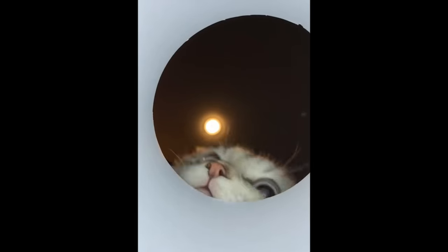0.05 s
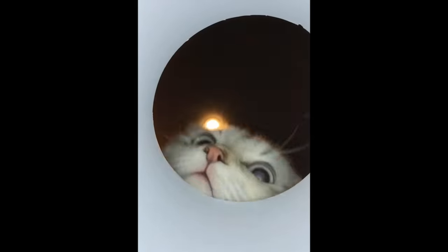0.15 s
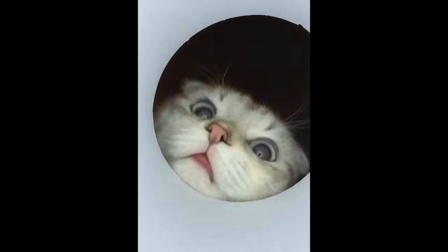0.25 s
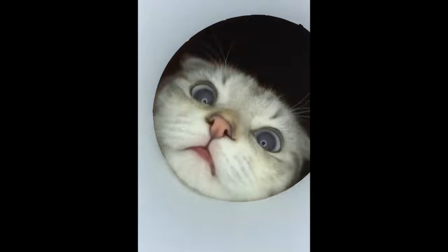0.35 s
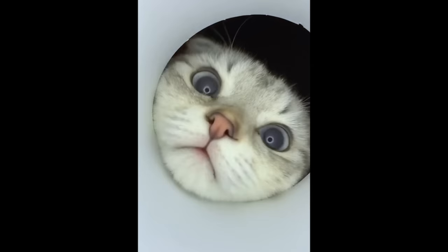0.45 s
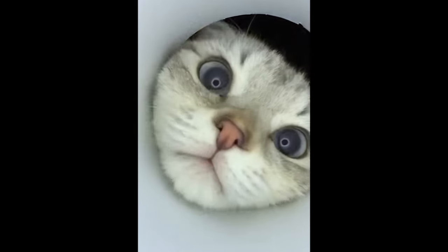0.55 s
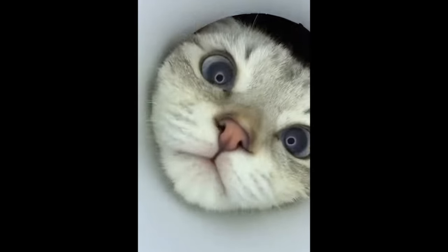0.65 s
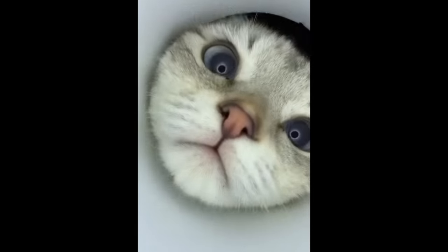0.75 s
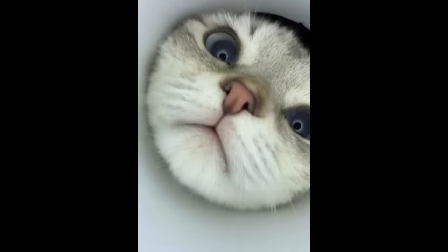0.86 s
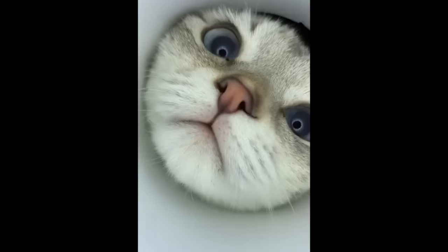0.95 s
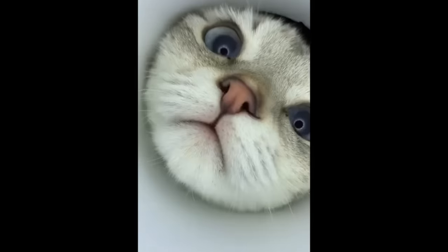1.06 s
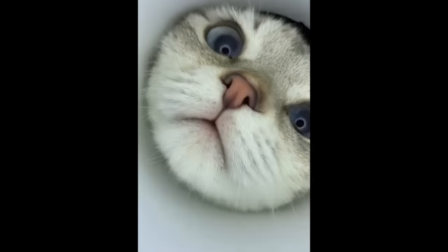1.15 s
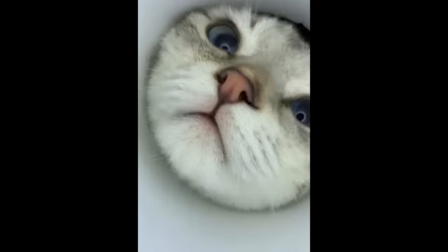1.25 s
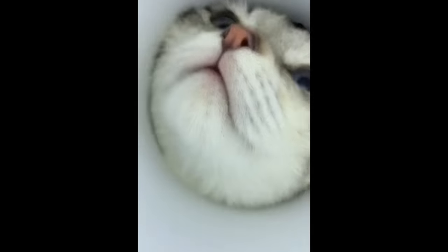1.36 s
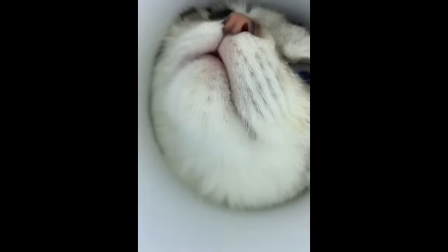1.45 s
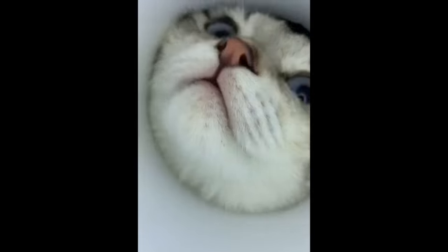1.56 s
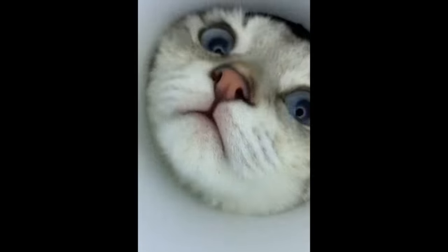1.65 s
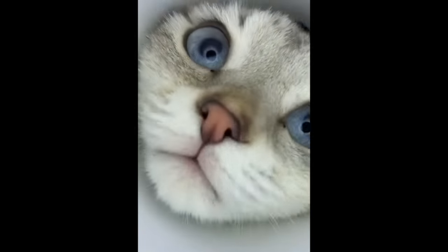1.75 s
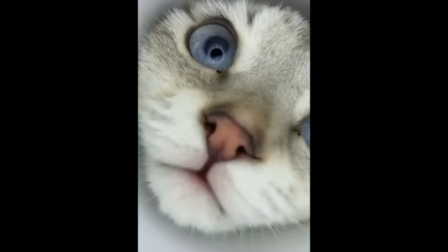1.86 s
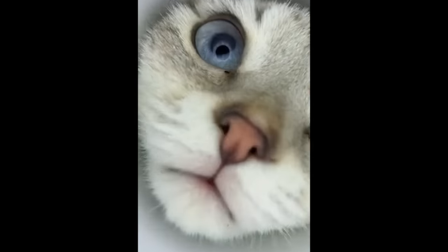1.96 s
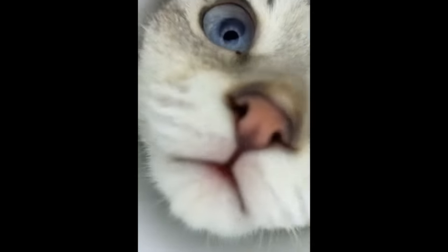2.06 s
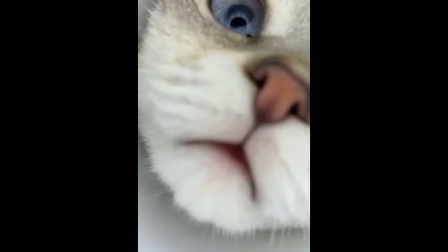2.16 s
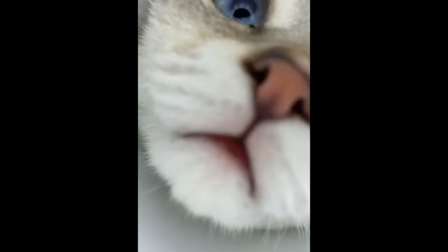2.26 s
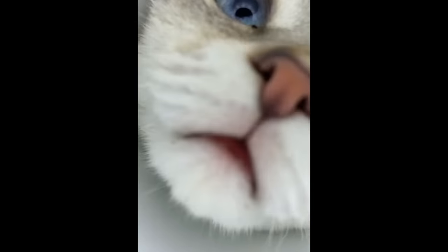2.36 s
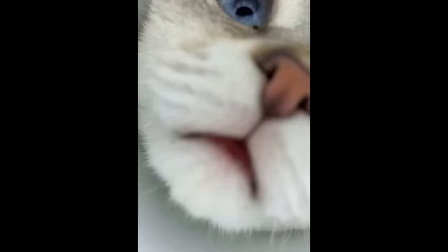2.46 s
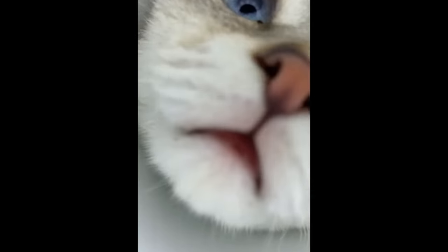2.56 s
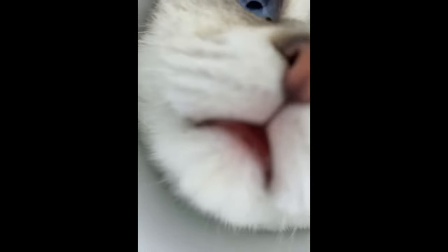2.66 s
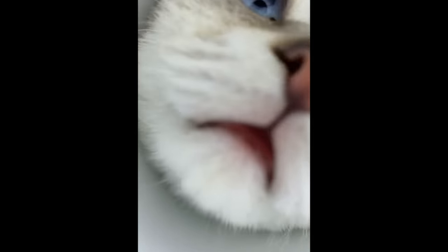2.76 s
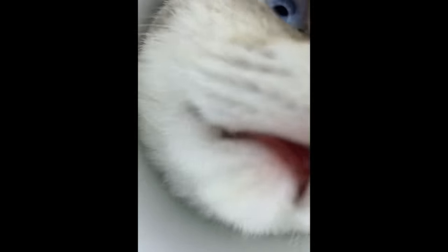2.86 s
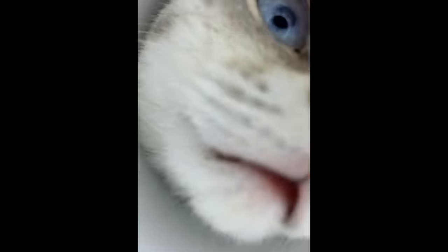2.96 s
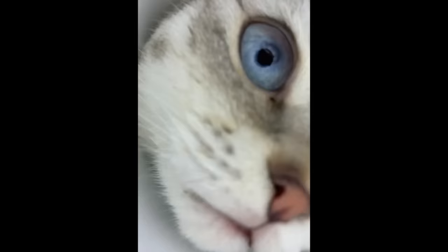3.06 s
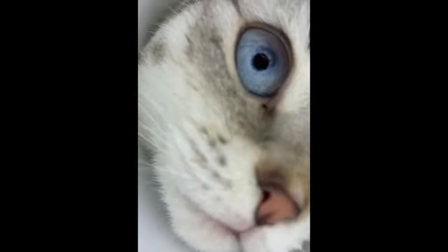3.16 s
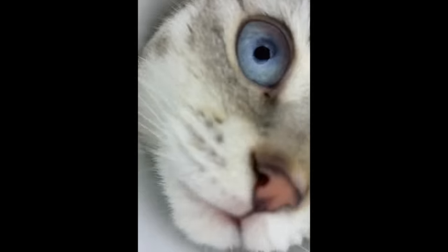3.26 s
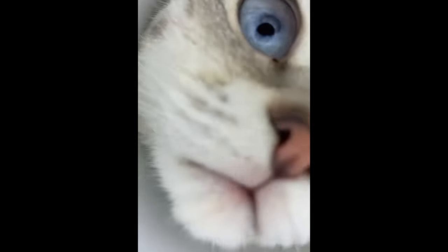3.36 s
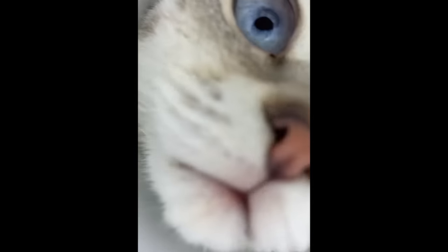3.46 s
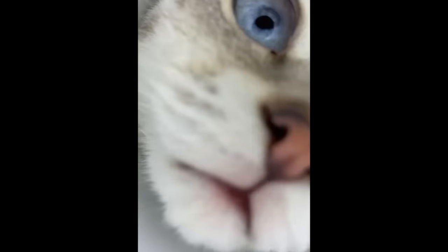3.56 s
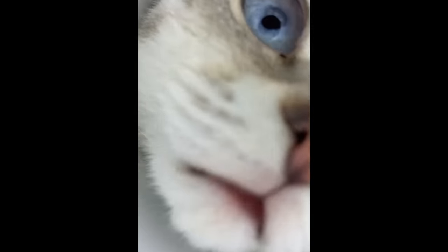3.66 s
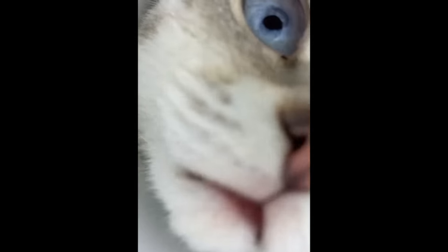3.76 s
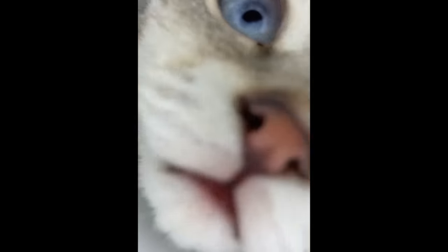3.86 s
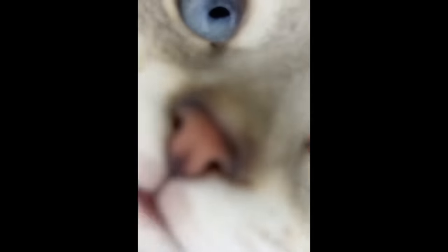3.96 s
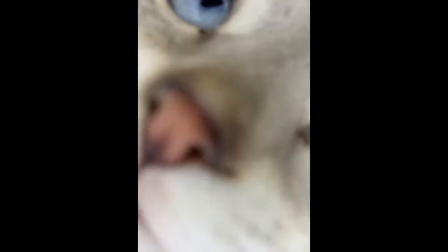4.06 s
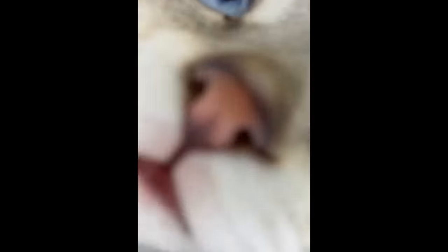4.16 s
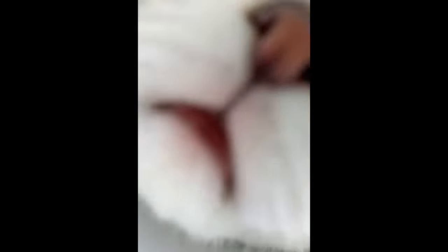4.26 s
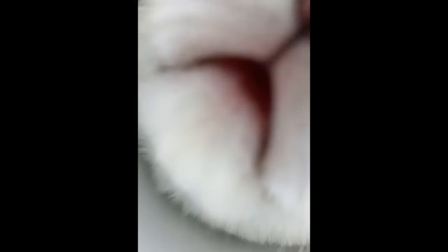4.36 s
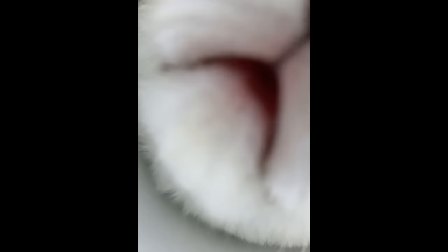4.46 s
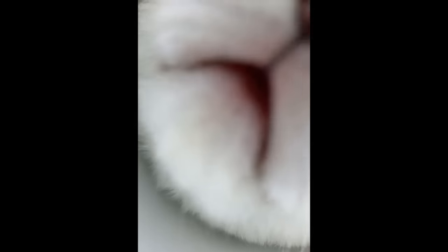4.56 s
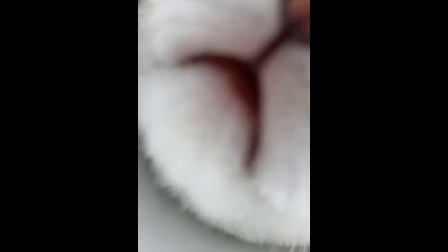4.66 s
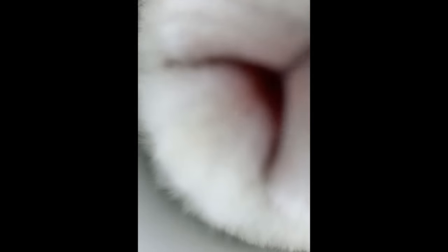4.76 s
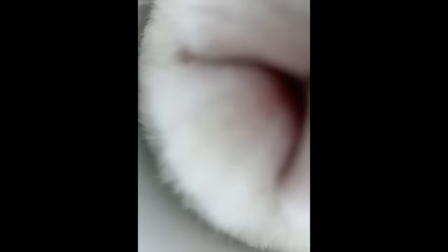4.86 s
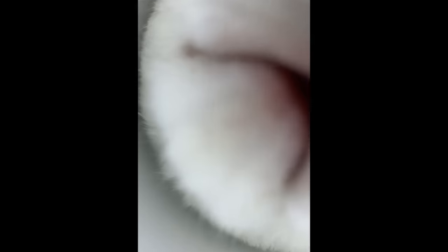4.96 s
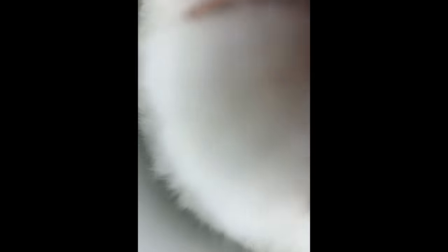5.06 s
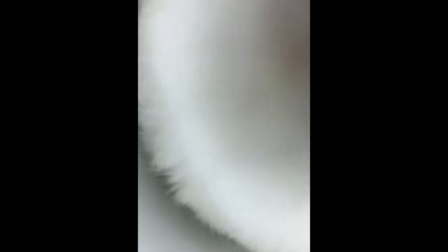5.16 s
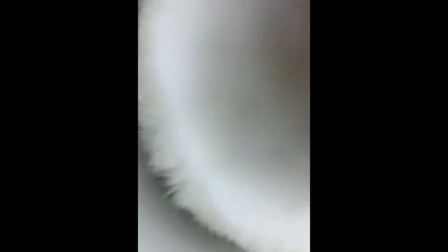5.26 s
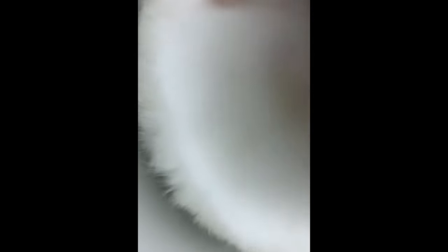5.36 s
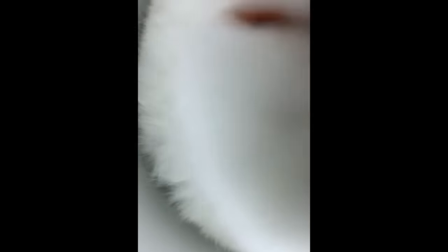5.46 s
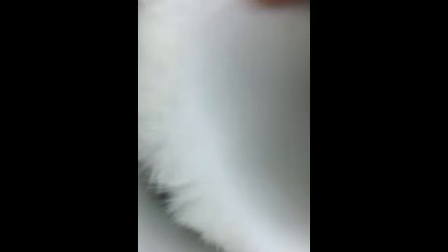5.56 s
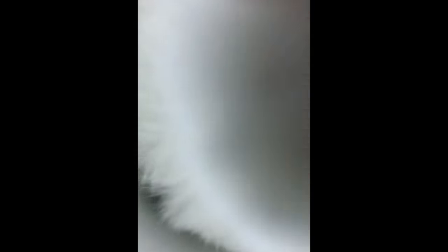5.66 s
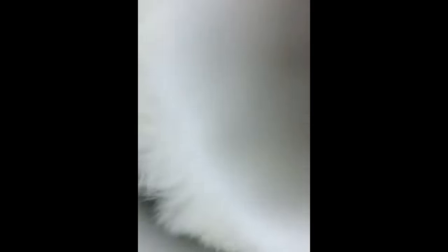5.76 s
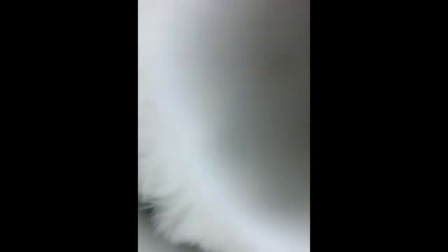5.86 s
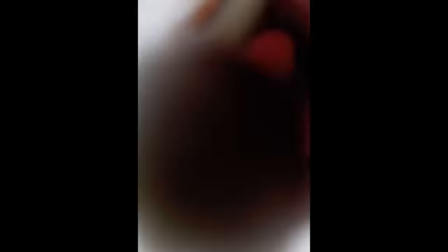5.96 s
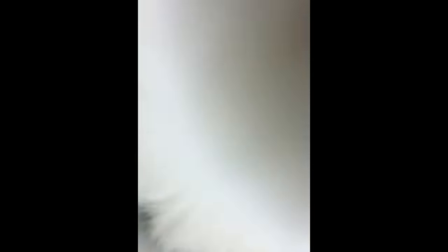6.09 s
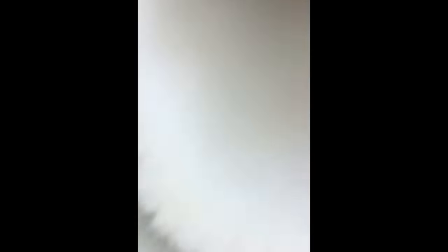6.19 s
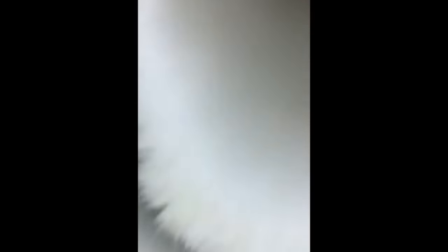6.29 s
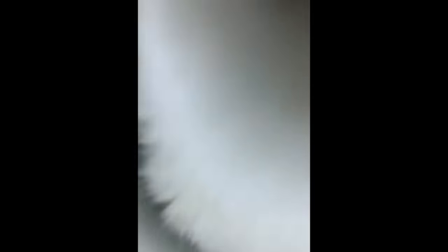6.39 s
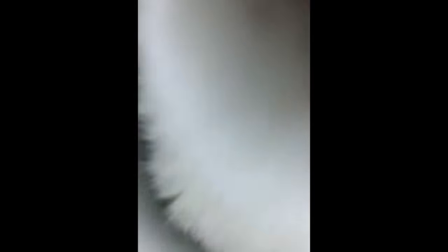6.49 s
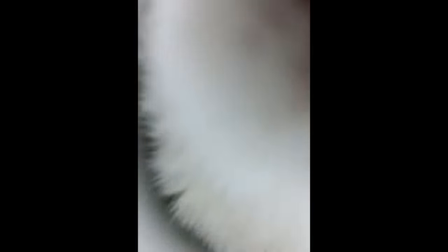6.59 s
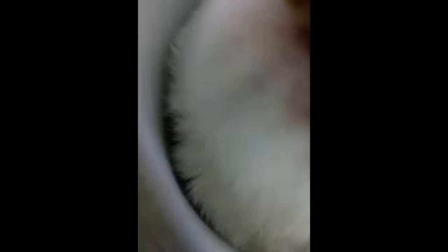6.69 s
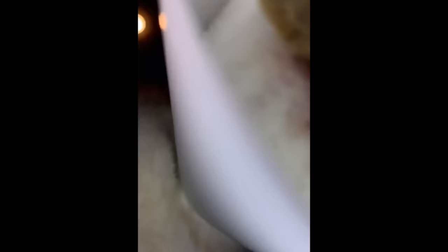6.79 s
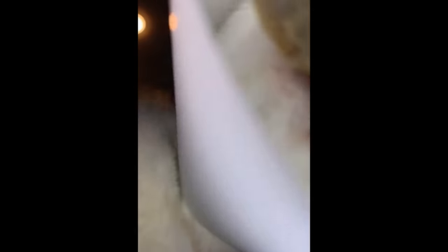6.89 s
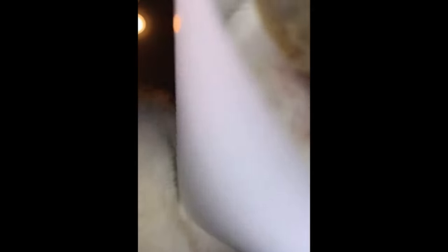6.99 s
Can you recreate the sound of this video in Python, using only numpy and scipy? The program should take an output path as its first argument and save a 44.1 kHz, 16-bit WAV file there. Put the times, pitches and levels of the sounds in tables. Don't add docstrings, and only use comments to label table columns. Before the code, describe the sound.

Very close handling noise of a cat pushing its head into a plastic cone. Fur brushes in soft hissing strokes with faint hair ticks, low bumps and creaks for about five seconds. Then a sudden hard knock and claw clicks hit the phone, followed by bursts of crackly scraping, dull thuds and nibbling ticks right on the microphone, easing at the end. No meow, quiet surroundings.

```python
import sys
import numpy as np
from scipy import signal
from scipy.fft import rfft, irfft, next_fast_len
from scipy.io import wavfile
from scipy.ndimage import uniform_filter1d, minimum_filter1d

SR = 44100
rng = np.random.default_rng(int(sys.argv[2]) if len(sys.argv) > 2 else 0)


def bounce(signal):
    frames = np.transpose(np.atleast_2d(signal))
    limited = np.clip(frames, -1, 1)
    pcm = np.round(limited * 32767).astype(np.int16)
    wavfile.write(sys.argv[1], SR, pcm)


def linear_from_db(decibels):
    return 10 ** (np.asarray(decibels, float) / 20)


N = 310057
EDGE_HZ = 13020


def evened(x):
    return x / np.sqrt(np.mean(x ** 2) + 1e-20)


def colour(x, points):
    f, db = np.transpose(points)
    hz = np.fft.rfftfreq(len(x), 1 / SR) + 1
    gain_db = np.interp(np.log(hz), np.log(f), db, left=-60)
    return irfft(rfft(x) * linear_from_db(gain_db), len(x))


def slow(hz):
    return evened(signal.lfilter(*signal.butter(2, hz, fs=SR), rng.standard_normal(N)))


def grit(spread_db, per_s):
    size = linear_from_db(spread_db * np.minimum(rng.exponential(1, N), 4))
    slips = size * (rng.random(N) < per_s / SR)
    return evened(rng.standard_normal(N) * (1 + slips))


def add(mix, s, sound):
    part = mix[round(s * SR):][:len(sound)]
    part += sound[:len(part)]


# start_s, peak_db
JOLTS = [(0.303, -44.5), (0.733, -47), (1.022, -46), (1.297, -45), (1.617, -43), (1.868, -41.5),
         (2.02, -41), (2.303, -42), (2.536, -42), (2.69, -34.5), (2.987, -37.5), (3.288, -43.5),
         (3.419, -43), (3.536, -40), (3.698, -48.5), (3.873, -43.5), (4.171, -39), (4.396, -46),
         (4.637, -41), (4.826, -44), (4.949, -43.5), (5.137, -13), (5.334, -45), (5.495, -26), (5.79, -40),
         (6.075, -23), (6.12, -18.5), (6.234, -30.5), (6.538, -34)]


def jolts():
    out, t = np.zeros(N), np.arange(round(0.045 * SR)) / SR
    rock = np.hanning(len(t)) * np.sin(2 * np.pi * 50 * t)
    for s, db in JOLTS:
        add(out, s, linear_from_db(db + 4.5) * rock)
    return out


# start_s, length_s, level_db, centre_hz, width_hz
BRUSHES = [
    (5.472, .025, -47, 8500, 2000),
    (5.575, 0.014, -38, 6040, 1500),
    (6.511, .045, -45, 12000, 2000),
    (6.516, 0.075, -50, 9000, 1500),
    (6.568, .1, -51, 5440, 2000),
    (6.582, 0.078, -54, 12200, 1500),
    (6.784, 0.16, -53.5, 12770, 1600),
]


def brushes():
    out = np.zeros(N)
    for s, length, db, hz, width in BRUSHES:
        noise = rng.standard_normal(8192)[:round(max(length, .01) * SR)]
        edges_hz = [hz - width / 2, hz + width / 2]
        band = signal.sosfilt(signal.butter(3, edges_hz, "band", fs=SR, output="sos"), noise)
        add(out, s, linear_from_db(db) * signal.windows.tukey(len(band), .4) * evened(band))
    return out


# start_s, peak_db, pitch_hz, t60_s
RINGS = [(3.1095, -36, 2250, .012), (3.12, -33.5, 1390, 0.024), (3.119, -35, 2220, .014),
         (3.1195, -41, 4470, .009), (3.189, -45, 3120, 0.0092), (3.192, -38, 1200, 0.0088),
         (3.121, -37, 450, 0.017), (4.821, -24, 7660, .008), (4.823, -28.5, 468, 0.027),
         (4.822, -33, 2250, .02), (5.151, -14, 2600, .01), (5.4555, -14, 5370, 0.0059),
         (5.507, -5.5, 1100, 0.0087), (5.572, -13.5, 6070, 0.0054), (6.089, -18.5, 880, 0.015),
         (6.3273, -21, 650, .015), (6.418, -30, 700, 0.013), (6.4514, -12.5, 1450, 0.0038),
         (5.152, -18, 3800, 0.0071), (6.562, -23, 1530, 0.0075), (6.561, -22, 2980, .004),
         (6.56, -28, 4200, 0.0048)]


def rings():
    out, t = np.zeros(N), np.arange(2048) / SR
    for s, db, hz, t60 in RINGS:
        fade = linear_from_db(db - 60 * t / max(t60, .003)) * np.minimum(t / 0.00017, 1)
        add(out, s, fade * np.sin(2 * np.pi * hz * t))
    return out


# start_s, peak_db, bright_top_db, dull_part_db
HAIR_TICKS = [(1.2231, -62, -14, -15), (1.428, -48, -31, 2), (1.5, -28.5, -21, -32),
              (1.8844, -23.5, -23, -15), (2.374, -31.5, -4.5, -19), (3.096, -35, -1, -20),
              (3.1088, -43, -14, -28), (3.119, -29, -5, -8), (3.1897, -27, -8, -27),
              (4.3309, -28.5, -16, -6), (4.6078, -59, -11, 4), (4.784, -21.5, -15, -14),
              (4.8225, -13.5, -12.5, -39)]
# start_s, peak_db, bright_top_db, dull_part_db
CLAW_TICKS = [(5.136, -36, -9, 5), (5.1507, 0.5, -45, -3.5), (5.181, -27, -4, 1), (5.346, -38.5, -12, 22.5),
              (5.3894, -14.5, -32, -21), (5.4556, -5.5, -16, -12), (5.4722, -21.5, 4.5, 7),
              (5.4814, -17, 1, 5), (5.4956, -6, -10.5, -9), (5.5058, -13, -33.5, 0),
              (5.5174, -25, 2.5, -18), (5.5245, -15.5, 3, 7), (5.5427, -17, -5, -4), (5.57, -10.5, -13, 3),
              (5.5822, -22, -32, 3), (5.6086, -1.5, -20, -7), (5.6218, -6, -15, -6),
              (5.7866, -31.5, -20, 12.5), (5.797, -34.5, -22, 14), (5.8659, -36, -30, 25.5),
              (5.884, -32, -21, 15.5), (5.9696, -29, -23, 10), (5.9892, -33, -17, 15)]
# start_s, peak_db, bright_top_db, dull_part_db
NIBBLES = [(6.0835, -36, -50, 5), (6.093, -41, -26, 3), (6.112, -12, -31, -22), (6.135, -8, -36, -14),
           (6.1737, -26.5, 7, 6.5), (6.2165, -13, -17, -17), (6.2292, -34, 2, -25),
           (6.2584, -23.5, -15, -32), (6.3132, -5.5, -9, -4.5), (6.321, -7.5, -5.5, -4),
           (6.3292, -18, -31, -19), (6.343, -10, -22, -1.5), (6.3513, -21, -8, -32),
           (6.4106, -11, -30, -22), (6.4173, -34.5, -18, 19), (6.432, -22, -18, 0), (6.4504, -14, -46, 4.5),
           (6.509, -25, -20, 2.5), (6.5124, -23, -24, -3), (6.561, -3, -25, -12), (6.6722, -19, -5, 12),
           (6.6783, -12, -12, -7), (6.6964, -17, -25, 4), (6.8553, -19.5, -55, -2),
           (6.8678, -16.5, -43, -14), (6.946, -53, -28, 3), (6.9598, -40, 2.5, -4)]
# start_s, peak_db, bright_top_db, dull_part_db
MORE_TICKS = [(5.1625, -19, -29, -20), (5.533, -18, -25, 1), (5.553, -31, 3, -15), (5.564, -32, -3, -20),
              (5.576, -22, -8, -19), (6.088, -32, -32, -13), (6.140, -17, -25, -5), (6.327, -18, -29, 8),
              (6.337, -26, -2, -8), (6.347, -20, -12, -8), (6.4195, -16, -25, -5), (6.544, -36, 10, -15),
              (6.684, -20, 5, 2), (6.691, -23, 0, -2), (6.88, -24, -30, -16), (5.9775, -25, -23, 4),
              (6.515, -20, -25, 1)]
# freq_hz, level_db
GRIND = [(800, -7), (1500, -2), (3000, -0.5), (4500, -12), (7000, -25.5)]
# freq_hz, level_db
FIZZ = [(3000, 5), (4500, 0.5), (8000, -3), (12800, -9.5)]
# freq_hz, level_db
DULL = [(100, -15), (300, -7), (600, -0.5), (1200, -4), (2200, -15), (5000, -82)]


def ticks(rows):
    mid, top, dull = np.zeros((3, N))
    t = np.arange(512) / SR
    for (s, db, top_db, dull_db), noise in zip(rows, rng.standard_normal((len(rows), 512))):
        snap = linear_from_db(db - 60 * t / 0.0071) * (1 - np.exp(-t / 0.001)) * noise
        add(mid, s, snap)
        add(top, s, linear_from_db(top_db) * snap)
        add(dull, s, linear_from_db(db + dull_db - 60 * t / 0.0022))
    return linear_from_db(6.0) * colour(mid, GRIND) + linear_from_db(14.0) * colour(top, FIZZ) + linear_from_db(7.0) * colour(dull, DULL)


# start_s, level_db, dull_share_db, fizz_share_db, length_s
STROKES = [(5.134, -47.5, 12.5, -11, 0.0096), (5.305, -46.5, 6, -8, 0.12), (5.465, -30.5, 3.5, -4, 0.031),
           (5.496, -33, -7, -17, 0.067), (5.56, -32, -5, -12, 0.029), (5.613, -43.5, 8, -3, 0.032),
           (5.764, -56, 9, -8, 0.067), (5.864, -51, 12.5, -13, 0.073), (5.958, -46.5, -5, -3, 0.06),
           (6.077, -40.5, 11.5, -39, 0.028), (6.122, -27, 2.5, -9, 0.035), (6.204, -42, -4, -0.5, 0.035),
           (6.323, -32, 15.5, 12, 0.0064), (6.325, -30, -0.5, -23, 0.036), (6.413, -35, 4, -33, 0.017),
           (6.525, -55, -16, 11, 0.072), (6.583, -47, 1.5, 4.5, 0.16), (6.669, -37.5, 8.5, 4.5, 0.044),
           (6.93, -50.5, 2.5, -7, 0.095)]


def strokes():
    grind, dull, fizz = np.zeros((3, N))
    for s, db, dull_db, fizz_db, length in STROKES:
        shape = signal.windows.tukey(round(max(length, .005) * SR), .6)
        for layer, share_db in (grind, 0), (dull, dull_db), (fizz, fizz_db):
            add(layer, s, linear_from_db(db + share_db) * shape)
    clump = linear_from_db(4.33 * slow(hz=149))
    out = grind * evened(colour(grit(5, 600), GRIND))
    out += fizz * evened(colour(grit(4, 900), FIZZ))
    out += dull * evened(colour(grit(7.65, 380), DULL))
    return clump * out


# start_s, peak_db, final_pitch_hz, t60_s
KNOCKS = [(1.053, -35, 139, 0.077), (1.422, -33, 144, 0.022), (1.554, -35, 141, 0.1),
          (2.037, -26, 122, 0.044), (2.215, -36, 140, 0.057), (2.707, -42, 96, 0.16),
          (2.83, -37.5, 141, 0.15), (2.956, -33.5, 125, 0.12), (3.113, -39, 368, 0.1),
          (3.187, -27.5, 205, 0.042), (3.202, -27, 125, 0.044), (3.954, -26, 154, 0.03),
          (4.819, -22.5, 167, 0.06), (5.139, -14, 172, 0.021), (5.147, 0.5, 168, 0.027),
          (5.33, -31.5, 180, 0.061), (5.453, -15, 235, 0.085), (5.504, 1.5, 113, 0.021),
          (5.568, -11, 170, 0.027), (5.624, -14, 318, 0.057), (5.782, -27.5, 446, 0.09),
          (5.862, -15, 538, 0.026), (5.97, -24.5, 565, 0.14), (5.969, -16, 93, 0.039),
          (6.031, -23.5, 210, 0.068), (6.129, -15, 132, 0.029), (6.446, -6, 494, 0.0081),
          (6.509, -29, 342, 0.11), (6.54, -30, 398, 0.15), (6.592, -19, 187.6, 0.14),
          (6.675, -25, 409, 0.14), (6.966, -35, 117, 0.055)]
RATTLE_DB = 2.5


def knocks():
    out, t = np.zeros(N), np.arange(8000) / SR
    drop = 0.805 + 0.968 * np.exp(-t / 0.00578) + 4.48 * np.exp(-t / 0.00146)
    for s, db, hz, t60 in KNOCKS:
        turns = np.cumsum(hz * drop) / SR
        fade_db = 60 * t / max(t60, .01) * np.sqrt(hz / 150)
        level = linear_from_db(db + 8.0 - fade_db) * (1 - np.exp(-t / 0.0062))
        add(out, s + 0.003035, level * np.sin(2 * np.pi * turns))
    return out * linear_from_db(RATTLE_DB * slow(hz=180))


RISE_DB_PER_S, FALL_DB_PER_S, ARCH_DB = 436, 294, 6.5


def swell(start, length, db, rise, fall):
    t = np.arange(N) / SR - start
    arch = ARCH_DB * np.clip(2 * t / max(length, 1e-3) - 1, -1, 1) ** 2
    return linear_from_db(db - arch - rise * np.maximum(-t, 0) - fall * np.maximum(t - length, 0)) ** 2


SCRAPE_DB, SCRAPE_PER_WEIGHT, GLASS_DB = -7.5, 0.71, 6.5
SHOVE_RISE_DB_PER_S, SHOVE_FALL_DB_PER_S, HELD_DB = 286, 224, -56
# hiss_db, scrape_db, rumble_db
REST_DB = (-89, -75.5, -67.5)
# start_s, length_s, speed_db, weight_on_wall_db
SLIDES = [(.05, 0.28, -49.5, -19), (.17, 0.57, -50, -4.5), (.72, 0.14, -49, 0), (.92, 0.049, -69.5, 15.5),
          (1.04, 0.032, -65, 14), (1.24, 0.13, -49, -1.5), (1.5, 0.093, -59.5, 12.5), (1.62, 0.24, -57, 3),
          (1.84, .14, -54.5, 4), (1.99, 0.18, -53, 4), (2.22, 0.18, -70, 17), (2.5, 0.12, -68.5, 15.5),
          (2.71, 0.23, -65, 14.5), (2.93, 0.11, -57, 11), (3.08, 0.067, -58.5, 11), (3.22, 0.19, -62, 6.5),
          (3.47, 0.03, -67, 14.5), (3.58, 0.094, -62.5, 4.5), (3.75, 0.28, -62.5, 11.5),
          (4.02, 0.16, -65.5, 12), (4.11, 0.17, -55, 9.5), (4.28, 0.14, -68, 19.5),
          (4.46, 0.059, -73.5, 20.5), (4.57, 0.26, -61.5, 16.5), (4.84, 0.33, -59, 10),
          (4.96, 0.12, -57, 10.5)]
# start_s, length_s, speed_db, weight_db
NUZZLES = [(5.32, 0.12, -60, 16), (5.45, 0.22, -65, 27), (5.67, 0.19, -70.5, 13), (5.78, 0.19, -58.5, 19),
           (5.95, 0.049, -50.5, 18.5), (6.05, 0.14, -52.5, 14), (6.2, 0.087, -65, 21.5),
           (6.3, 0.068, -58.5, 18), (6.41, 0.055, -61, 21), (6.51, 0.083, -52, 10),
           (6.57, 0.12, -52.5, 19.5), (6.66, 0.11, -54, 14.5), (6.8, 0.12, -62.5, 10),
           (6.95, 0.11, -63, 16)]
# start_s, peak_db
SHOVES = [(0.386, -46), (.78, -46), (1.067, -62), (1.576, -43), (2.076, -43), (2.74, -87), (3.027, -42.5),
          (3.197, -44), (3.956, -41.5), (4.186, -42), (4.583, -39), (4.826, -33.5), (5.157, -34),
          (5.364, -26), (5.522, -25), (5.652, -38), (5.802, -37), (5.995, -24.5), (6.127, -23),
          (6.331, -34), (6.432, -40.5), (6.616, -31), (7.003, -44)]


def contact():
    power = np.ones((4, N)) * linear_from_db(np.array([*REST_DB, HELD_DB]))[:, None] ** 2
    for rows, face_db in (SLIDES, 0), (NUZZLES, GLASS_DB):
        for start, length, speed_db, weight_db in rows:
            share_db = np.array([0, SCRAPE_DB + face_db + SCRAPE_PER_WEIGHT * weight_db, weight_db])
            slide = swell(start, length, speed_db, RISE_DB_PER_S, FALL_DB_PER_S)
            power[:3] += linear_from_db(share_db)[:, None] ** 2 * slide
    for s, db in SHOVES:
        power[3] += swell(s, 0, db + ARCH_DB, SHOVE_RISE_DB_PER_S, SHOVE_FALL_DB_PER_S)
    return 10 * np.log10(power)


# freq_hz, width_hz, level_db, change_db_per_s as the head fills it
CONE = [(657, 80, 2, -18), (953, 90, -7, -8), (1580, 220, -5, .5), (2600, 300, -19, 1), (3450, 300, 0, 1),
        (4500, 420, -4, 1)]
# freq_hz, level_db
FUR = [(2500, 3), (3500, -18), (5000, -2), (7500, 3.5), (10000, -2), (12800, -4.5)]
# freq_hz, level_db
SCRAPE = [(300, -3.5), (700, 8), (1500, 7.5), (3000, -2.5), (6000, -10), (12800, -58.5)]
# freq_hz, level_db
RUMBLE = [(80, 5.5), (160, -3), (400, -1), (650, -8.5), (1100, -72), (3000, -44.5)]
# freq_hz, level_db
SWAY = [(30, -35), (50, 0.5), (70, -15), (130, -10.5), (220, -22), (500, -112)]


def rubbing():
    hiss_db, scrape_db, rumble_db, sway_db = contact()
    size = next_fast_len(N)
    hz = np.fft.rfftfreq(size, 1 / SR)
    hiss = evened(colour(rng.standard_normal(N), FUR))
    draught = rfft(rng.standard_normal(N), size)
    for f, width, db, change_db in CONE:
        mode = evened(irfft(draught / (1 + ((hz - f) / (width / 2)) ** 2), size)[:N])
        hiss += linear_from_db(db - 7.5 + change_db * np.arange(N) / SR) * mode * np.sqrt(width / 300)
    jerk = slow(hz=33.6)
    out = linear_from_db(hiss_db + 4.0 + 0.12 * jerk) * hiss
    out += linear_from_db(scrape_db + 2.3 * jerk) * evened(colour(grit(3.73, 700), SCRAPE))
    out += linear_from_db(rumble_db + 1.5 * jerk + 2.5 * slow(hz=40)) * evened(colour(grit(5, 150), RUMBLE))
    return out + linear_from_db(sway_db + 0.4 * slow(hz=20.6)) * evened(colour(rng.standard_normal(N), SWAY))


def scene():
    handling = jolts() + brushes() + rings()
    hits = ticks(HAIR_TICKS + CLAW_TICKS + NIBBLES) + ticks(MORE_TICKS) + strokes() + knocks()
    return np.tile(handling + hits + rubbing(), (2, 1))


def steady(x, t):
    treble = np.diff(x, 2) ** 2
    peak = -minimum_filter1d(-uniform_filter1d(treble, 64), 1024)
    crest = peak / (uniform_filter1d(treble, 1024) + 1e-14)
    return np.interp(t * SR, np.arange(len(crest)), crest) < 4.2


def blocks(frames, count, size):
    draw = rng.standard_normal((512 // count + 1, frames // size + 1))
    return np.repeat(np.repeat(draw, count, 0), size, 1)[:513, :frames]


LEAK_DB, ATTACK_LEAK_DB = -12.5, -7
# start_s, length_s, above_hz
STARVED = [
    (2.42, .06, 10000),
    (4.46, .09, 9800),
    (4.79, .025, 10000),
    (5.585, .02, 9600),
    (5.64, .04, 10500),
    (6.425, .08, 9400),
    (6.945, .055, 10200),
]


def patchy(wide):
    hz, t, z = signal.stft([wide[0] + wide[1], wide[0] - wide[1]], SR, nperseg=1024)
    hz = hz[:, None]
    power_db = 10 * np.log10(uniform_filter1d(uniform_filter1d(abs(z) ** 2, 11, 1), 2, 2) + 1e-16)
    louder_db = power_db.max(0)
    rough = np.clip((hz - 300) / 1500, 0, 1)
    filled = np.clip((hz - 4300) / 1000, 0, 1)
    shared = blocks(len(t), count=20, size=3) + blocks(len(t), count=9, size=5)

    bass = (hz[:, 0] > 200) & (hz[:, 0] < 1500)
    treble = (hz[:, 0] > 4500) & (hz[:, 0] < 12500)
    heavy_db = louder_db[bass].mean(0) - louder_db[treble].mean(0)
    starved = np.clip((uniform_filter1d(heavy_db, 8) - 8) / 15, 0, 1)

    calm = steady(wide[0], t)
    leak = linear_from_db(np.where(calm, LEAK_DB, ATTACK_LEAK_DB))
    leak = leak * uniform_filter1d(blocks(len(t), count=40, size=4), size=25, axis=0)
    z += 1j * z[::-1] * leak * np.clip(hz / 1200, 0, 1)

    bed_db = minimum_filter1d(louder_db, size=5, axis=1) + 2
    gone = (hz > EDGE_HZ + 400) & (calm > 0)
    for start, length, above_hz in STARVED:
        gone |= (hz > above_hz) & (t > start) & (t < start + length)

    for part, own_db in zip(z, power_db):
        own = blocks(len(t), count=14, size=6)
        noise = rng.standard_normal(part.shape) + 1j * rng.standard_normal(part.shape)
        lost = louder_db - own_db + 1.5 * own > 12.5 + 40 * filled
        lost |= shared + own < -3.3 - 3 * (1 - starved) * filled
        weak = uniform_filter1d(louder_db - own_db, 12, 0) > 5
        lost |= weak & (filled > .5) & (blocks(len(t), count=64, size=4) > 1.1 - 1.5 * starved)
        fill = rough * linear_from_db(np.minimum(own_db, bed_db) - 6)
        fill = fill + filled * linear_from_db(np.minimum(louder_db, bed_db) - 4)
        part += noise * calm * fill
        waver_db = (1.8 - filled + 2.5 * starved * filled) * (shared + .8 * own)
        part *= linear_from_db(rough * (waver_db - 35 * lost) * (.3 + .7 * calm))
    total, apart = signal.istft(z * linear_from_db(-30 * gone), SR, nperseg=1024)[1][:, :N] / 2
    return np.array([total + apart, total - apart])


def roll_off(x):
    return signal.sosfilt(signal.butter(12, 15900, fs=SR, output="sos"), x)


# freq_hz, phase_rad
TURN = [(0, 0), (60, .4), (200, 1), (450, 1), (1050, -.4), (2300, -1.3), (3900, -3.14), (12300, -19)]
# freq_hz, level_db
LEAN = [(300, 0), (650, -5), (2500, 0)]


def record(dry):
    size = next_fast_len(N + 8192)
    hz = np.fft.rfftfreq(size, 1 / SR)
    top_db = -28 / (1 + np.exp((EDGE_HZ - hz) / 60)) - .017 * np.maximum(hz - EDGE_HZ, 0)
    limit = linear_from_db(top_db) * hz ** 4 / (hz ** 4 + 34.7 ** 4)
    late = 2 * np.pi * 1.213 * np.log(1 + hz / 120)
    half = np.interp(hz, *np.transpose(TURN)) / 2
    lean = linear_from_db(np.interp(hz, *np.transpose(LEAN)) / 2)
    ears = np.array([lean * np.exp(-1j * half), np.exp(1j * half) / lean])
    wide = irfft(rfft(dry, size) * limit * ears * np.exp(-1j * late), size)[:, :N]
    ceiling = .6
    mix = patchy(ceiling * np.tanh(wide / ceiling))
    return roll_off(mix)


dry = scene()
out = record(dry)
bounce(out)
```